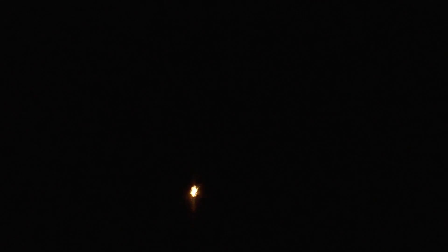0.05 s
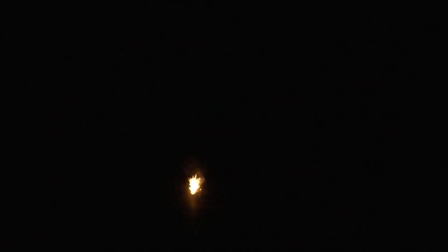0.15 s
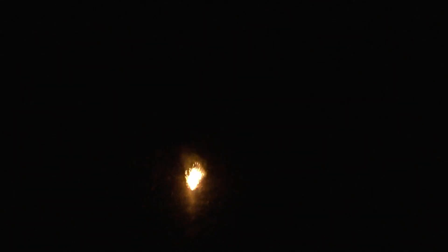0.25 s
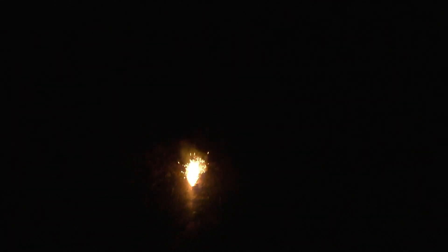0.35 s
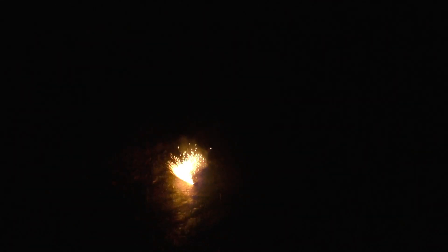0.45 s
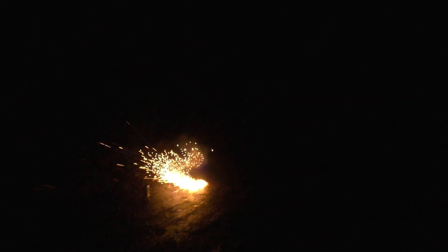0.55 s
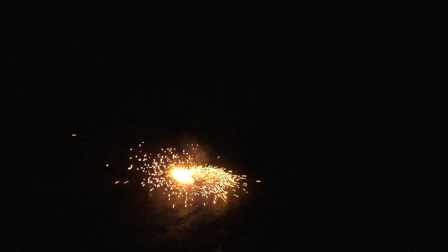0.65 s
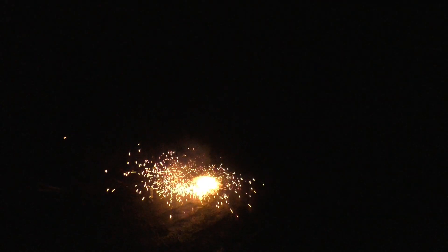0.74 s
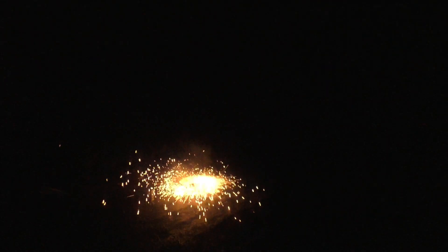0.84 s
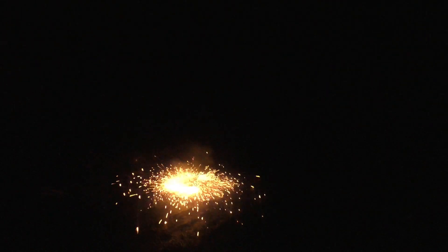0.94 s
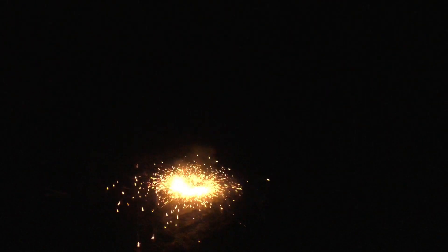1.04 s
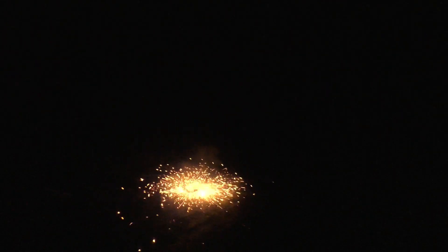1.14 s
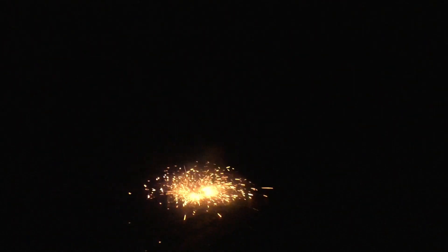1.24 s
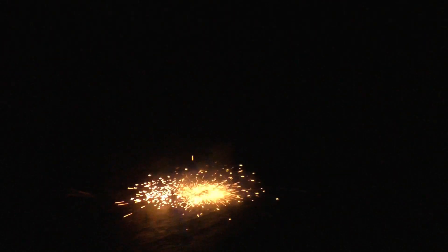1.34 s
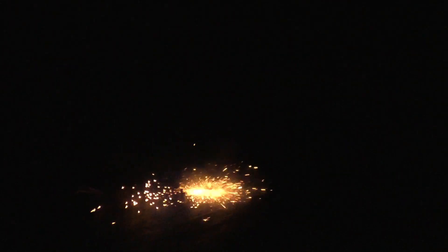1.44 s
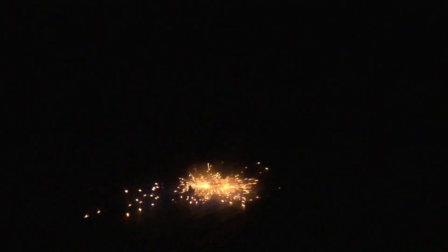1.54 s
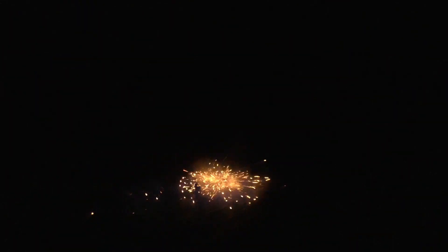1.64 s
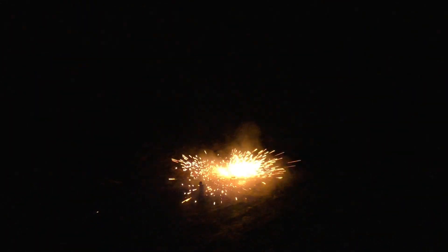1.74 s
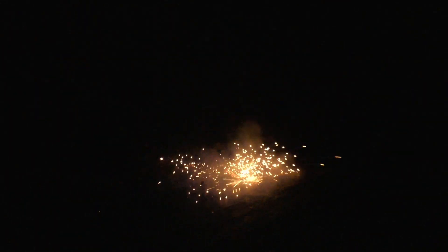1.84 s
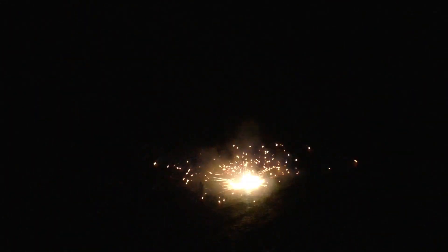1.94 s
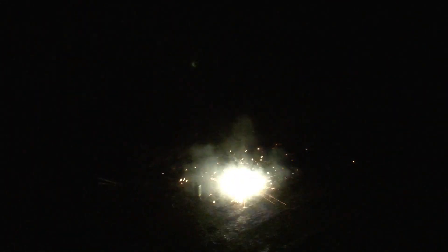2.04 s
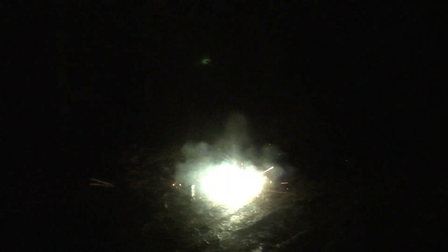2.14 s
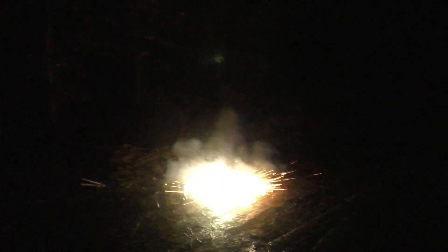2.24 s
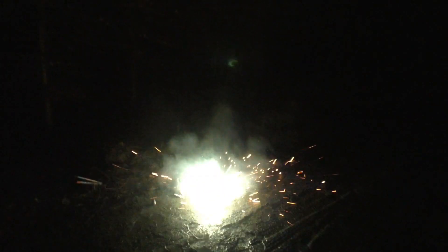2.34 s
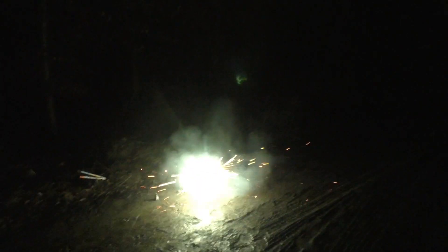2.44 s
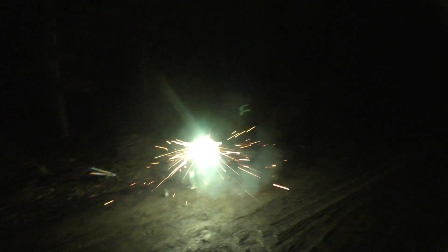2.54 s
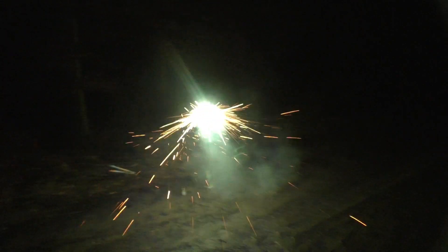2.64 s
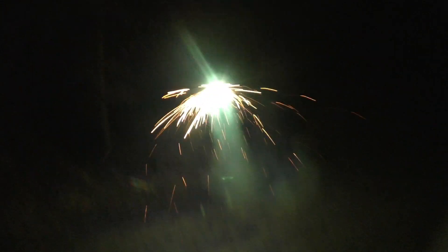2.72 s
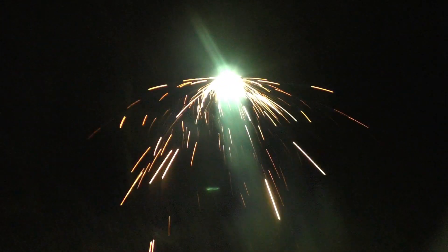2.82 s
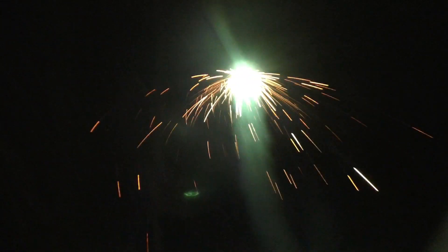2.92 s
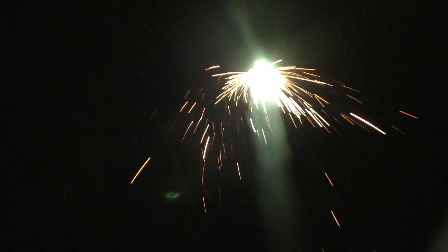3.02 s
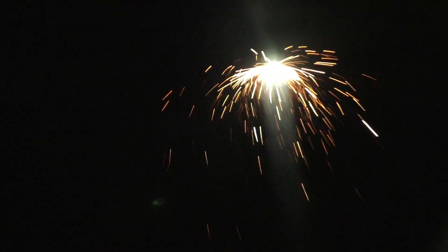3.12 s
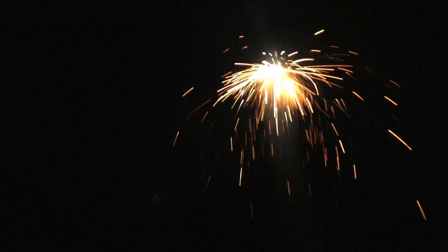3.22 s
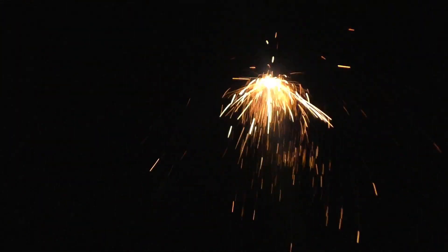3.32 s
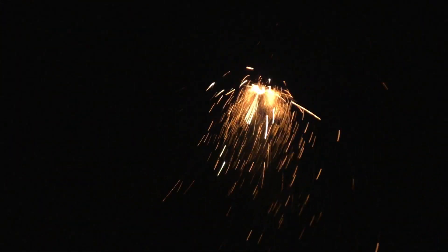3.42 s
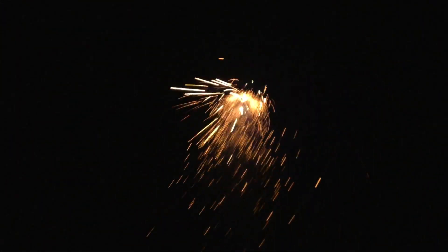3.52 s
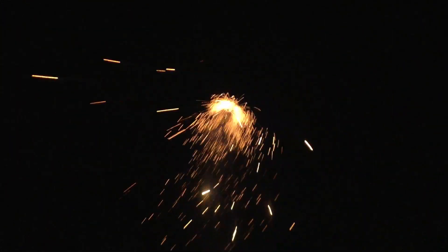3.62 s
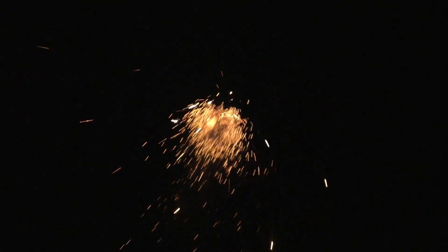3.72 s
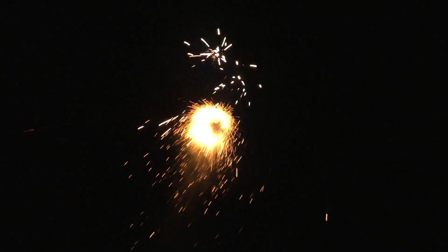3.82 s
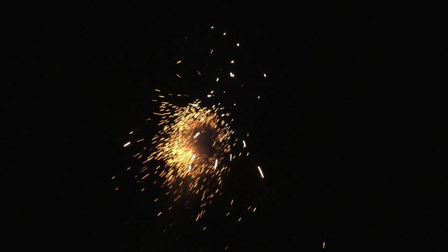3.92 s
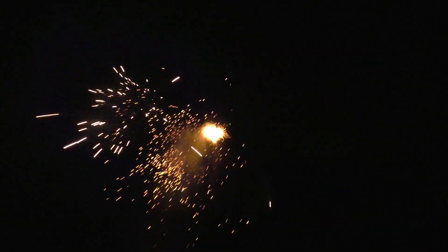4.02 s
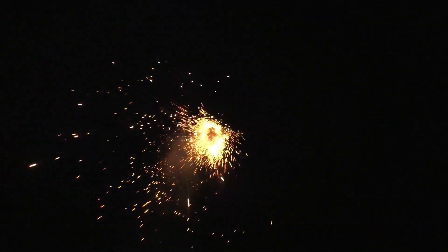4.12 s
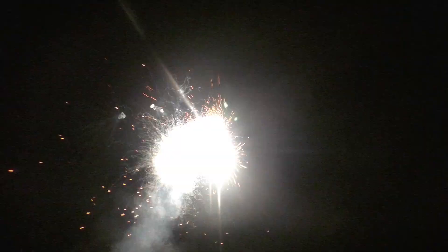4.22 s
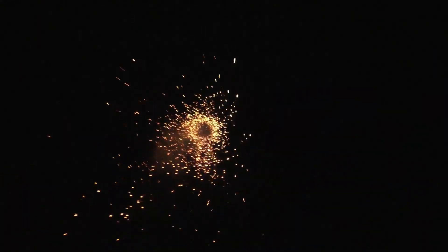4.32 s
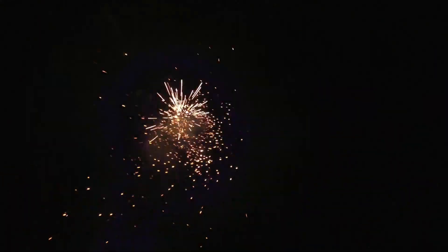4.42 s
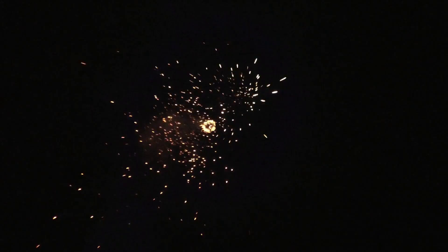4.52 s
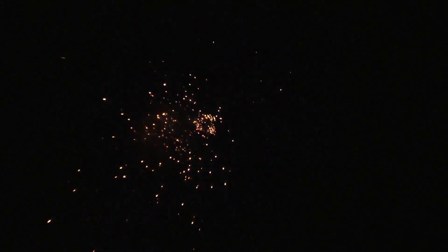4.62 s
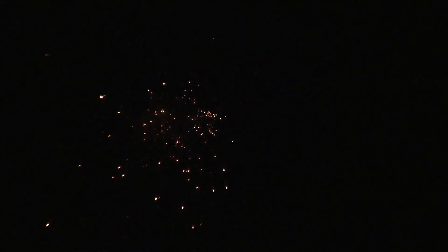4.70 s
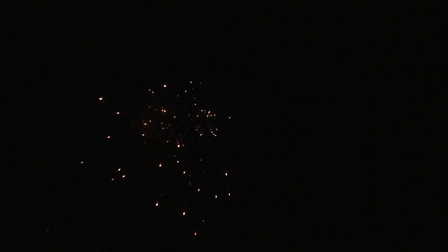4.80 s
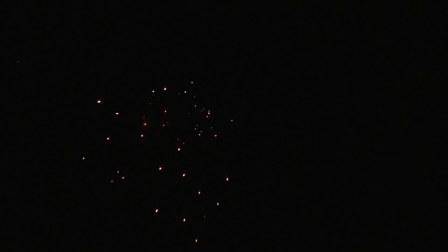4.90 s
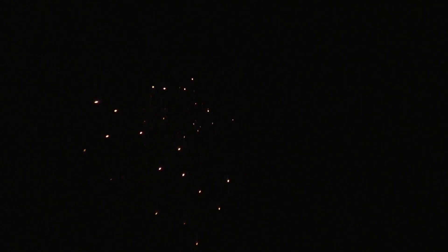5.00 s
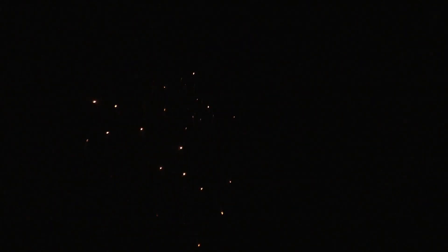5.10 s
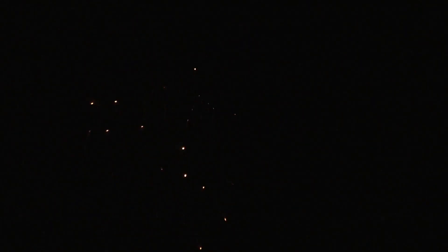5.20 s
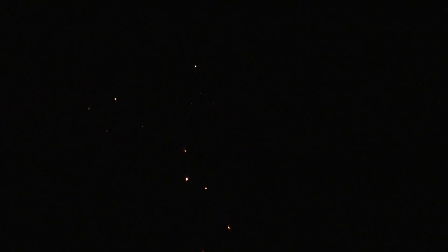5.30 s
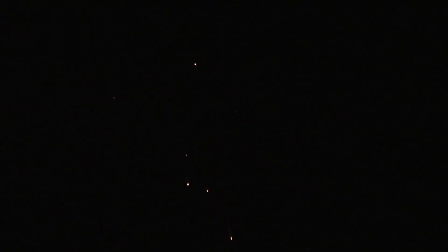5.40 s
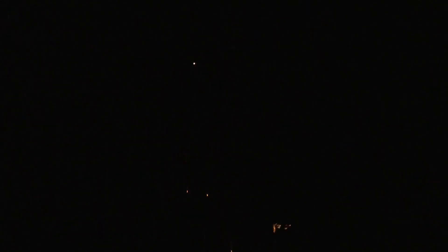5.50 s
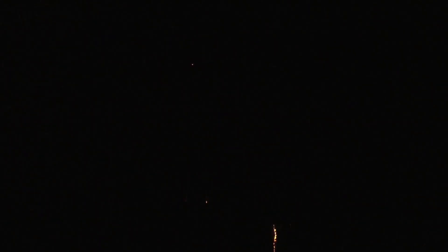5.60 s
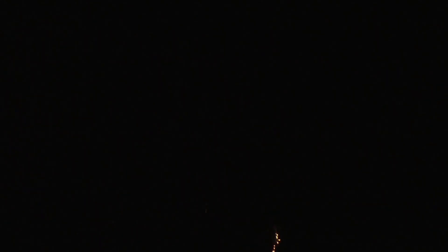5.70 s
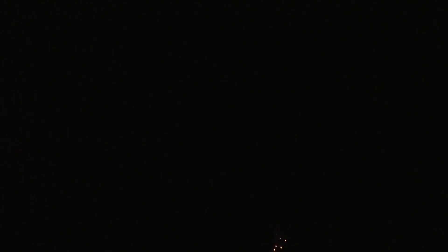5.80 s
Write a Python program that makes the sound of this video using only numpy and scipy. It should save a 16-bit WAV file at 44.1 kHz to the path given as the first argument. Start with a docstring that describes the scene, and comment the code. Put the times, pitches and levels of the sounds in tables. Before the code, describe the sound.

Outdoors at night, a small spinning firework ignites on the ground with a swelling bright hiss that flutters faster and faster, sputtering with small coughs. It lifts off in a rushing whoosh with a sweeping hollow tone, thins out, then bursts into about twenty dry, very loud cracks within a second. Sparks sizzle and echoes fade into faint rumble; one late pop follows. Close stereo microphones overload on the loudest cracks.

```python
"""A jet hisses up from the ground at night: a firework lights, spins up, slows a little before lift-off,
then whirls fastest in flight and bursts. Shaped noise makes its hiss, which throbs at the spin rate; the
delayed ground echo sweeps a comb down through it in the climb, and short blasts make the jet's coughs.
The star pops are sharp fronts with suction lobes; they overload a close pair of microphones, then ring
away over open ground and trees, amid sizzling sparks, wind on the ports and a distant rumble."""
import sys
import numpy as np
from scipy import signal
from scipy.io import wavfile
from scipy.ndimage import uniform_filter1d

SR = 44100
rng = np.random.default_rng(int(sys.argv[2]) if len(sys.argv) > 2 else 0)


def elevation(decibels):
    """Turn decibel levels (scalar or array-like) into linear amplitude ratios."""
    levels = np.asarray(decibels, float)
    return 10 ** (levels / 20)


def dump(signal):
    """Clip the signal to [-1, 1] and save it as 16-bit WAV at the path in sys.argv[1]."""
    limited = np.clip(np.atleast_2d(signal).T, -1, 1)
    pcm = np.round(limited * 32767).astype(np.int16)
    wavfile.write(sys.argv[1], SR, pcm)


N = 258032
T = np.arange(N) / SR

# Spin of the firework. Each row: time in seconds, turns per second.
SPIN_RATE = [(.58, 6.3), (.7, 6.9), (.85, 9.1), (1, 14.35), (1.15, 22.08), (1.3, 28.9), (1.45, 32.18),
             (1.6, 40.7), (2, 38), (2.15, 30.4), (2.42, 64), (2.56, 66.6), (3.03, 66.7), (3.8, 56)]
# Stereo width of the scattered echoes and the sparks. Each row: frequency in Hz, side over mid in dB.
OPEN_AIR_WIDTH = [(60, -2), (150, -12), (380, -2.5), (950, -5), (2380, -4.5), (5980, -2), (15000, 7)]


def evened(x):
    """Scales to rms 1."""
    return x / np.sqrt(np.mean(x ** 2) + 1e-20)


def read(points, hz):
    """A spectrum table read on a log-frequency axis, as a column."""
    f, value = np.transpose(points)
    return np.interp(np.log(hz + 1), np.log(f + 1), value)[:, None]


def curves(rows, t):
    """The columns of a time table, interpolated at t."""
    s, *columns = np.transpose(rows)
    return [np.interp(t, s, column) for column in columns]


def lumpy(shape, samples):
    """Random drift of rms 1: white noise averaged twice over a span of samples."""
    once = uniform_filter1d(rng.standard_normal(shape), samples)
    return evened(uniform_filter1d(once, samples))


def noise(level_db, side, size):
    """Left and right from random mid and side short-time spectra; level_db(hz, t) shapes the mid."""
    hop = size // 4
    frames = N // hop + 5
    hz, t = np.fft.rfftfreq(size, 1 / SR), np.arange(frames) * hop / SR
    a, b, c, d = rng.standard_normal((frames, len(hz), 4)).T
    mid_bins = a + 1j * b
    side_bins = (c + 1j * d) * elevation(read(side, hz))
    bins = np.array([mid_bins, side_bins]) * elevation(level_db(hz, t))
    mid, half = signal.istft(bins, nperseg=size, noverlap=size - hop)[1][:, :N]
    return np.array([mid + half, mid - half])


def turns():
    """Angle of the nozzle in turns: the running sum of the spin rate."""
    first_turn = .43  # where the nozzle points as the spin sets in
    spinning = T > SPIN_RATE[0][0]
    return first_turn + np.cumsum(curves(SPIN_RATE, T)[0] * spinning) / SR


def jet():
    """Turbulent gas: roar and sizzle shift with the burn, the flame sputters, the turning nozzle throbs."""
    # Burn of the jet. Each row: time in seconds, hiss level in dB before throb and sputter.
    burn = [(0.02, -59), (0.12, -56.5), (0.2, -45), (0.3, -37), (0.55, -31.5), (0.63, -27), (0.9, -25),
            (1.4, -27), (1.55, -25), (1.76, -23.5), (1.82, -30), (1.92, -31), (2.04, -23.5), (2.36, -24),
            (2.65, -21.5), (3.05, -24.5), (3.6, -31), (3.82, -35), (4.06, -46.5)]
    # Spectrum of the gas. Each row: frequency in Hz, relative density in dB per Hz.
    gas_colour = [(40, -36), (90, -24), (164, -14), (323, -7.5), (492, -9), (1040, -4.5), (1620, -2),
                  (3300, -5), (4420, -5), (7940, 1), (10500, -2), (13600, -4), (15500, -12.5), (16300, -39)]
    # Stereo width of the gas. Each row: frequency in Hz, side over mid in dB.
    gas_width = [(60, -7.5), (130, -22.5), (290, -18), (640, -29.5), (1410, -26.5), (3100, -16.5),
                 (6820, -15), (15000, -7)]
    # Shifts of the spectrum. Each row: time in seconds, then rumble, roar and sizzle in dB before
    # their frequency weights.
    shifts = [(0.05, 1, 2.5, 11.5), (0.2, -5.5, 3, -4.5), (0.4, 3, -2, 0), (0.7, 2.5, 2.5, 1.5),
              (1.07, 1, -1.5, 4.5), (1.4, 0, 1.5, 2.5), (1.72, -1.5, 1, -2), (1.85, 1, -1, 7.5),
              (2.2, 1, 1, 4), (2.35, 2, -0.5, -0.5), (2.55, -6, -3, -2), (2.8, -6.5, -4, -2.5),
              (3.1, -4, -1, -7), (3.45, 1.5, 1.5, -0.5), (4.0, 1, -6.5, 0)]
    throb_slow_db, throb_fast_db, blur_turns_per_s, throb_builds_s = 4.6, 1.5, 27, .48

    def gas_db(hz, t):
        rumble_db, roar_db, sizzle_db = curves(shifts, t)
        deep = read([(500, 1), (1000, 0)], hz)
        low = read([(1500, 0.88), (3200, 0.0043)], hz)
        high = read([(8500, 0), (12000, 1)], hz)
        speckle = rng.standard_normal((len(t), len(hz))).T
        patches = evened(uniform_filter1d(uniform_filter1d(speckle, 8, 0), 20, 1))
        ends_db = deep * rumble_db + low * roar_db + high * sizzle_db
        return read(gas_colour, hz) + ends_db + 1.2 * patches

    gas = noise(gas_db, gas_width, size=256)
    hiss_band = signal.butter(4, [2500, 9000], "band", fs=SR, output="sos")
    hiss = signal.sosfilt(hiss_band, gas[0])  # the left hiss sets the level
    sputter, flicker = lumpy(N, 60), lumpy(N, 200)
    # fast turns blur together, so the throb grows shallower
    spin = curves(SPIN_RATE, T)[0]
    depth_db = throb_fast_db + throb_slow_db / (1 + (spin / blur_turns_per_s) ** 4)
    angle = 2 * np.pi * turns()
    build = np.clip((T - SPIN_RATE[0][0]) / throb_builds_s, 0, 1) ** .5
    throb_db = depth_db * (np.cos(angle) + 0.14 * np.cos(2 * angle - .6)) * build
    burnout_db = -150 * np.maximum(T - burn[-1][0], 0)
    flame_db = 1.44 * sputter + 0.27 * sputter ** 2 + 0.2 * flicker
    return elevation(curves(burn, T)[0] + throb_db + burnout_db + flame_db) * gas / hiss.std()


def blast(ms, suction, steep):
    """A pressure push of height 1, then a longer suction lobe."""
    u = np.arange(round(ms * SR / 40)) / (SR * ms / 1000)  # time in push lengths
    push = (1 - np.exp(-steep * u)) ** 2 * np.exp(-1.5 * u ** 2)
    shape = push - suction * 0.15 * u ** 2 * np.exp(-.86 * u)
    return shape / shape.max()


def coughs():
    """Lumps of charge go off in the nozzle: soft, low, ragged blasts."""
    # Each row: start in seconds, level in dB before roughening, time scale of the push in ms.
    lumps_of_charge = [(0.316, -34, 1.5), (0.8249, -16, 0.43), (1.3658, -18, 2), (1.546, -13.5, 0.56),
                       (1.5522, -21, 0.49), (1.623, -18.5, 0.28), (1.6677, -16.5, 0.32), (1.677, -17, .3),
                       (1.702, -19.5, 0.4), (1.7728, -15.5, 0.44), (1.7846, -10.5, 0.41),
                       (1.7897, -19.5, 3.1), (1.989, -23, 0.45), (2.0511, -19, 0.54), (2.0726, -12, 0.35),
                       (2.078, -13, .4), (2.1919, -10.5, 0.3), (2.196, -13, 0.3), (2.268, -19, 0.32),
                       (2.318, -18, 1.3), (2.332, -22, 2.1), (2.345, -11, 0.46), (2.3491, -14, 0.94),
                       (2.3542, -20.5, 0.59), (2.4094, -9.5, 0.28), (2.5011, -19, 0.66), (2.674, -14, 0.35),
                       (2.872, -24.5, .5), (3.0631, -19, 0.84), (3.31, -27, 1.1), (3.3845, -8, 0.22),
                       (3.4331, -9.5, 0.3), (3.4635, -17.5, 0.4), (3.558, -24, 0.73), (3.6506, -18, 0.17),
                       (3.6535, -12, 0.17), (3.6529, -11.5, 0.17), (3.749, -13, 0.25)]
    out = np.zeros(N + SR)
    for s, db, ms in lumps_of_charge:
        puff = elevation(db) * blast(max(ms, .15), suction=0.23, steep=5.9)
        out[round(s * SR):][:len(puff)] += puff
    ragged = lumpy(N, 12)
    return signal.lfilter(*signal.butter(2, 90, "high", fs=SR), out[:N] * (1.24 + 0.49 * ragged))


def whir():
    """The whirling body beats the air: one low pressure swing per turn in flight, fading ever faster."""
    from_s, rms_db, fade_db_per_s2 = 2.4, -47, 27
    after = T - from_s
    level = elevation(rms_db - fade_db_per_s2 * after ** 2) * np.clip(1 + after / .03, 0, 1)
    return np.sqrt(2) * level * np.sin(2 * np.pi * turns())


def pops():
    """Each star is a shock front, a suction lobe and a few ms of ragged debris; the air swings back to rest."""
    # Bursting stars. Each row: start in seconds, level in dB before the band filter, deepest suction after
    # ms, suction weight (front 1.25), left over right in dB.
    stars = [(3.6716, -0.5, 0.36, 0.58, 2), (3.8654, -2, 0.29, 0.38, 2), (3.877, -3.5, 0.35, .45, 3),
             (3.8904, -9, 0.45, 0.35, .2), (3.8942, 1, 0.53, 0.39, 0), (3.9021, -14.5, 0.67, 0.33, 9),
             (3.9726, -1.5, 0.33, 0.93, 1.3), (4.0846, 5, 0.4, 0.58, 2.5), (4.117, 4.5, 0.32, 0.48, 1),
             (4.1536, 0, 0.28, 1, 2), (4.1977, -7, 0.47, 0.99, 0), (4.2038, -9.5, 0.96, 0.38, 3),
             (4.2668, -2.5, 0.82, 0.3, 0), (4.278, -3.5, 1, 0.33, 2), (4.3098, 1, 0.69, 0.27, 1.5),
             (4.3334, 1.5, .27, .8, 2.3), (4.3358, 4, .3, .85, -3.2), (4.5155, 5.5, 0.28, 0.54, 1.5),
             (4.5695, -11.5, 0.76, 0.27, -.6), (4.5904, 7, 0.23, 0.64, 0), (5.5214, -48, .1, 0.44, 2.5),
             (5.6208, -6.5, 1, 0.28, 1)]
    spike_ms, suction_fade_ms = 0.049, 0.16
    out, ms = np.zeros((2, N + SR)), np.arange(200) * 1000 / SR
    debris = uniform_filter1d(rng.standard_normal((len(stars), 2, 200)), size=2)
    for (s, db, lag_ms, suction, pan_db), (middle, sides) in zip(stars, debris):
        swell = np.sin(np.pi / 2 * np.clip(ms / lag_ms, 0, 1)) ** 2
        lobe = swell * np.exp(-np.maximum(ms - lag_ms, 0) / suction_fade_ms)
        push = 1.25 * np.exp(-(ms / spike_ms) ** 2) - suction * lobe
        rag = middle + .4 * sides * np.array([[1], [-1]])
        rag = rag * elevation(-13 - 10 * ms) * np.minimum(ms / .15, 1)
        level = elevation(db + pan_db * np.array([[.5], [-.5]]))
        start = round(s * SR)
        out[:, start:start + 200] += level * (push + rag)
    return signal.lfilter(*signal.butter(1, [120, 12000], "band", fs=SR), out[:, :N])


def sparks():
    """Sparks flung out by some of the stars: a grainy bright hiss swells in ms, holds briefly and dies down."""
    # Each row: start in seconds, level in dB before the grain, decay by 60 dB in seconds.
    showers = [(3.9, -44, 0.22), (4.096, -33.5, 0.56), (4.164, -33, 0.3), (4.345, -33.5, 0.8),
               (4.528, -34, 0.67), (4.6, -32, 0.48), (5.63, -55, 0.16)]
    # Spectrum of the sizzle. Each row: frequency in Hz, relative density in dB per Hz.
    sizzle_colour = [(500, -24), (1500, 10), (4000, 5), (8000, -1), (15500, -19)]
    hold_s, swell_s = 0.029, 0.0044
    power = np.zeros(N)
    for s, db, t60 in showers:
        after = np.maximum(T - s, 0)
        fading = elevation(db - 60 * np.maximum(after - hold_s, 0) / t60)
        power += (fading * np.minimum(after / swell_s, 1)) ** 2
    grain = lumpy(N, 40)
    hiss = noise(lambda hz, t: read(sizzle_colour, hz) + 0 * t, OPEN_AIR_WIDTH, size=256)
    return np.sqrt(power) * elevation(1.7 * grain) * evened(hiss)


def echo_lag_ms():
    """How much longer the path by way of the ground is, from the height of the source."""
    # steady acceleration up to a top height, a stay there, then the spent stars fall
    lift_off_s, climb_m_per_s2, top_m, fall_from_s, rest_m = 2.295, 12.8, 15.3, 4.235, .023
    distance_m, ear_m, sound_m_per_s, gravity_m_per_s2 = 6, 1.9, 343, 9.81
    rise = rest_m + climb_m_per_s2 / 2 * np.maximum(T - lift_off_s, 0) ** 2
    drop = gravity_m_per_s2 / 2 * np.maximum(T - fall_from_s, 0) ** 2
    height = np.maximum(np.minimum(rise, top_m) - drop, 0)
    direct = np.hypot(distance_m, height - ear_m)
    by_ground = np.hypot(distance_m, height + ear_m)
    return 1000 * (by_ground - direct) / sound_m_per_s


def ground(x):
    """The echo lags more as the source climbs; at steep angles rough soil scatters its treble over a few ms."""
    # share of the sound returned: source lying on the ground, just above it, high up
    at_rest, near, high_up, drop_ms = .55, .8, .21, 5.8
    lag_ms = echo_lag_ms()
    strength = high_up + (near - high_up) * np.exp(-(lag_ms / drop_ms) ** 2)
    strength -= (near - at_rest) * np.exp(-(lag_ms - lag_ms[0]) / .06)
    dull = signal.filtfilt(*signal.butter(1, 2300, fs=SR), x)
    treble = x - dull
    stones = rng.standard_normal((1, 150)) * elevation(-7000 * T[:150])
    scattered = signal.oaconvolve(treble, stones / np.linalg.norm(stones), axes=1)[:, :N]
    grazing = np.exp(-lag_ms / .4)
    echo = dull + grazing * treble + .55 * (1 - grazing) * scattered
    return np.array([strength * np.interp(T - lag_ms / 1000, T, v) for v in echo])


def wall(bursts):
    """One hard surface answers each pop with a single band-limited echo."""
    lag_ms, echo_db = 16.6, -19
    echo = signal.lfilter(*signal.butter(1, [900, 7000], "band", fs=SR), bursts)
    return elevation(echo_db) * np.roll(echo, round(lag_ms * SR / 1000), axis=1)


def field(x):
    """Scattered echoes from trees and slopes: they set in late and ring on longest below the treble."""
    # Ringing of the open ground. Each row: frequency in Hz, decay by 60 dB in seconds.
    ringing = [(100, 0.66), (400, 1.3), (1200, 3.1), (3000, 2.38), (7000, 0.29), (15000, 0.15)]
    # Colour of the echoes. Each row: frequency in Hz, relative level in dB.
    echo_colour = [(100, -24.5), (400, -2.5), (1500, -2), (4000, -3.5), (9000, 10.5), (15000, -1)]
    # one random tap of either sign in every 20 samples
    taps = np.zeros((2, 2 * SR))
    at = np.arange(700, 2 * SR - 20, 20) + rng.integers(0, 20, (2, (2 * SR - 701) // 20))
    np.put_along_axis(taps, at, rng.choice([-1., 1.], at.shape), 1)
    hz, t, z = signal.stft(taps, SR, nperseg=256)
    z *= elevation(read(echo_colour, hz) - 60 * t / read(ringing, hz))
    z[1] *= elevation(read(OPEN_AIR_WIDTH, hz))
    mid, half = signal.istft(z, SR, nperseg=256)[1]
    tail = np.array([mid + half, mid - half]) / np.linalg.norm(mid)
    return signal.fftconvolve(x.mean(0)[None], tail, axes=1)[:, :N]


def wind():
    """Low wind noise on the microphone ports, with separate lumps at each and a few gusts."""
    # Changing level of the wind. Each row: time in seconds, level in dB before the lumps.
    breeze = [(0, -50), (.8, -50.5), (1.5, -44), (2.5, -63), (3.5, -55), (4.3, -50.5), (5.0, -57),
              (5.3, -59), (5.85, -49)]
    # Spectrum of the wind. Each row: frequency in Hz, relative density in dB per Hz.
    wind_colour = [(15, -6), (30, 4.5), (90, -12), (300, -8), (600, -17.5), (1200, -48.5)]
    # Each row: peak time in seconds, added level in dB before the lumps, rise in seconds, decay by 60 dB
    # in seconds.
    strikes = [(3.71, -26.5, .012, 0.26), (5.57, -46.5, 0.33, 0.5)]
    lumps = lumpy((2, N), 1500)
    width = [(20, 2.5), (300, -6.5)]  # (Hz, side over mid dB)
    air = noise(lambda hz, t: read(wind_colour, hz) + 0 * t, width, size=2048)
    level = elevation(curves(breeze, T)[0])
    for s, db, rise_s, t60 in strikes:
        rise = np.clip(1 + (T - s) / rise_s, 0, 1) ** 2
        level = level + elevation(db - 60 * np.maximum(T - s, 0) / t60) * rise
    return level * elevation(2.2 * lumps) * evened(air)


def night():
    """Distant rumble, as low shaped noise whose level drifts slowly."""
    # Spectrum of the rumble. Each row: frequency in Hz, relative density in dB per Hz.
    rumble_colour = [(35, -35), (60, -1), (144, -7), (176, -14.5), (247, -10), (617, -9), (695, -3.5),
                     (1960, -15.5), (7000, -52.5), (9100, -75.5), (15400, -120)]
    # Each row: time in seconds, level in dB.
    swell = [(0, -47.5), (4.9, -56.5), (5.2, -48.5), (5.85, -46)]
    # Stereo width of the rumble. Each row: frequency in Hz, side over mid in dB.
    rumble_width = [(60, 14.5), (150, -12.5), (380, 6), (950, -6.5), (2380, -2.5), (5980, -1),
                    (15000, -3.5)]
    air = noise(lambda hz, t: read(rumble_colour, hz) + 0 * t, rumble_width, size=2048)
    return elevation(curves(swell, T)[0]) * evened(air)


def scene():
    """All sources with ground echo, wall and field."""
    gas, bursts = jet() + coughs(), pops()
    direct = gas + bursts
    echoes = field(elevation(-35) * gas + elevation(-22) * bursts)
    return direct + ground(direct) + wall(bursts) + echoes + sparks() + whir() + night() + wind()


def band_limit(x):
    """A steep low-pass at the top of the band."""
    return signal.sosfilt(signal.butter(12, 15950, fs=SR, output="sos"), x)


def record(dry):
    """The microphones add faint self-noise, and their input overloads on the loudest pops."""
    self_noise_db = -71.5
    noisy = dry + elevation(self_noise_db) * rng.standard_normal(dry.shape)
    clipped = np.clip(noisy, -.99, .99)
    return band_limit(clipped)


dry = scene()
out = record(dry)
dump(out)
```